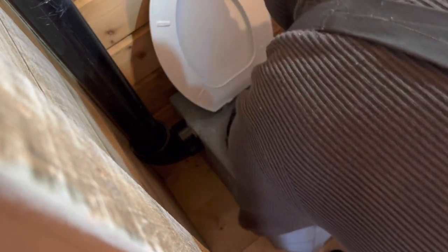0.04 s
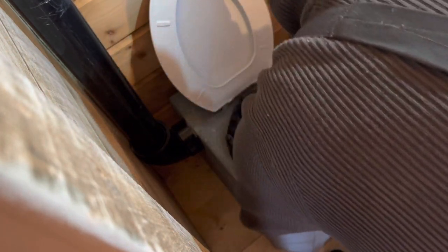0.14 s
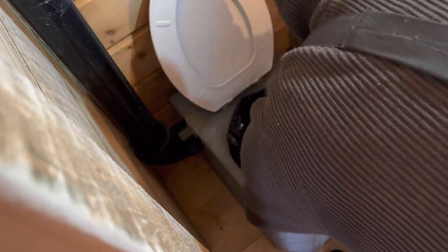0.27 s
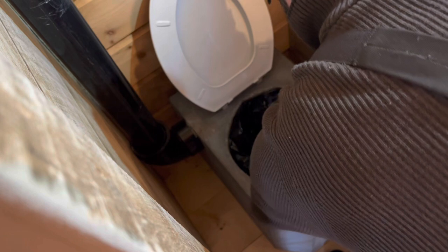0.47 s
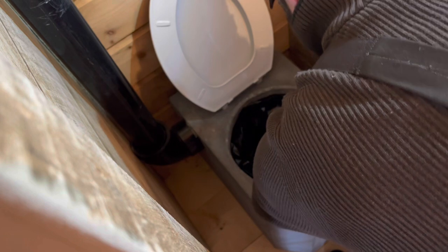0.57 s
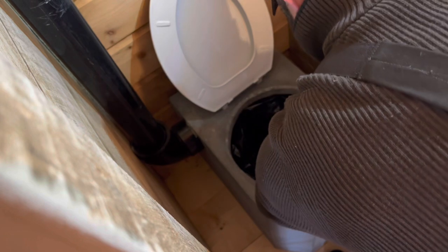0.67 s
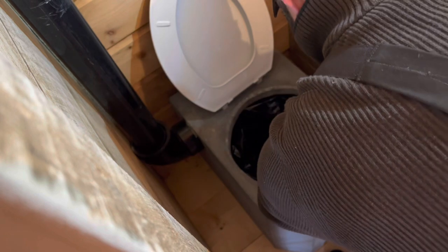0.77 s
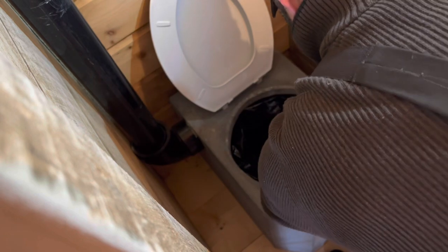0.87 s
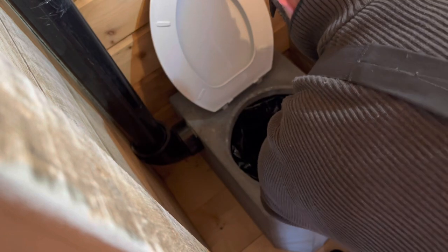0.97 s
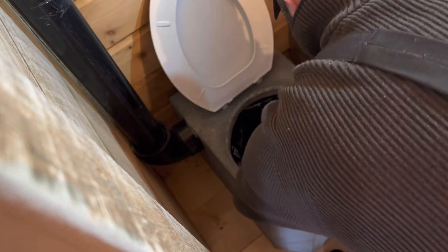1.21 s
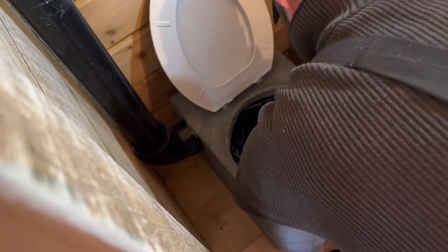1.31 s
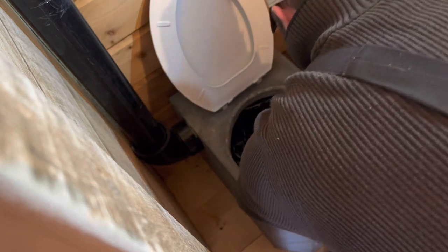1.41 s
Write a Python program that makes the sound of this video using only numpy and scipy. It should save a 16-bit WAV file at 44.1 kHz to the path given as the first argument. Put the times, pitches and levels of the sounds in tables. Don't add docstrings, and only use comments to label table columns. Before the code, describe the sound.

A plastic pail lined with a heavy bag is shoved into a concrete base; soft bumps first, then a loud cluster of hollow knocks with scraping and floor boom, fading to faint rustles, close in a small wooden room.

```python
import sys
import numpy as np
from scipy import signal
from scipy.fft import rfft, irfft, next_fast_len
from scipy.io import wavfile
from scipy.ndimage import uniform_filter1d, minimum_filter1d

SR = 44100
rng = np.random.default_rng(int(sys.argv[2]) if len(sys.argv) > 2 else 0)


def makeup_ratio(level_db):
    decades = np.asarray(level_db, float) / 20
    return 10 ** decades


def unload_audio(sound):
    columns = np.transpose(np.atleast_2d(sound))
    steps = np.round(np.clip(columns, -1, 1) * 32767)
    wavfile.write(sys.argv[1], SR, steps.astype(np.int16))


N = 63945


def evened(x):
    return x / np.sqrt(np.mean(x ** 2) + 1e-20)


def read(points, hz):
    f, value = np.transpose(points)
    return np.interp(np.log(hz + 1), np.log(f + 1), value)


def follow(points):
    return makeup_ratio(np.interp(np.arange(N) / SR, *np.transpose(points)))


def add(mix, s, sound):
    part = mix[round(s * SR):][:len(sound)]
    part += sound[:len(part)]


def colour(x, points):
    db = read(points, abs(np.fft.fftfreq(4096, 1 / SR)))
    log = np.log(makeup_ratio(np.maximum(db, -100)))
    taps = np.fft.ifft(np.exp(np.conj(signal.hilbert(log)))).real[:2048]
    return signal.oaconvolve(x, taps / np.linalg.norm(taps))[:len(x)]


def ring(modes, extra_db=0, length=1.0, phase=0):
    hz, db, t60 = np.transpose(modes)[:, :, None]
    t = np.arange(0, length, 1 / SR)
    return (makeup_ratio(db + extra_db - 60 * t / t60) * np.sin(2 * np.pi * hz * t + phase)).sum(0)


# [t/s, deep pair level/dB, upper pair level/dB]
FLOOR_SHOVES = [(.003, -32, -47), (.03, -21, -33.5), (0.072, -34, -44), (0.113, -37, -27),
                (0.151, -42, -24.5), (0.213, -15.5, -33), (0.24, -25, -19.5), (0.321, -36.5, -27.5),
                (0.362, -20, -26.5), (0.398, -35, -38), (0.446, -37, -21), (0.496, -10, -6.5),
                (0.524, -34.5, -11.5), (0.561, -7.5, -13), (.625, -25.5, -13), (0.703, -61, -13),
                (0.769, -28.5, -28.5), (0.831, -43, -29.5), (.862, -53, -29.5), (0.894, -32, -29.5),
                (0.944, -25.5, -29), (0.999, -60, -42.5), (1.09, -33, -41.5), (1.201, -50.5, -69.5),
                (1.27, -79, -60), (1.336, -45, -51.5), (1.388, -39.5, -41.5), (1.43, -70, -75)]
# [f/Hz, level/dB, t60/s]
DEEP_FLOOR = [(72.12, -4, 0.84), (95.37, -2, 0.39)]
# [f/Hz, level/dB, t60/s]
UPPER_FLOOR = [(125.94, -0.8, 0.3), (140.6, 0.091, 0.15)]
SHOVE_S = 0.008


def floor():
    out = np.zeros(N)
    push = np.hanning(round(SHOVE_S * SR))
    push = push / push.sum()
    deep = signal.oaconvolve(ring(DEEP_FLOOR), push)
    upper = signal.oaconvolve(ring(UPPER_FLOOR), push)
    for s, deep_db, upper_db in FLOOR_SHOVES:
        add(out, s, makeup_ratio(deep_db + 2.0) * deep + makeup_ratio(upper_db + 8.5) * upper)
    return out


# [t/s, level/dB]
RIM_DRAG = [(0.0, -34), (0.06, -40), (0.096, -34.5), (0.432, -45.5), (0.444, -22.5), (0.48, -17),
            (0.5, -8.5), (0.568, -18), (0.58, -22.5), (0.678, -34.5), (0.71, -43.5), (0.86, -52.5),
            (0.988, -45.5), (1.174, -65.5), (1.214, -60), (1.45, -41)]
# [f/Hz, level/dB, t60/s]
PAIL_WALL = [(484, -11.5, 0.62), (553.7, -1, 0.29), (585, -5.5, 0.047), (630.7, 2.5, 0.16),
             (1189, -3.5, 0.077), (1344, -3, 0.07), (809, 3.5, 0.037), (904.5, -9, 0.22),
             (1088, -5.5, 0.04), (1116.6, -7.5, 0.16), (1260, -3, 0.064), (1589, -5, 0.057),
             (1520, -15, 0.34), (2070, -33.5, 0.12)]
# [f/Hz, level/dB, t60/s]
PAIL_HOLLOW = [(223.7, -4, 0.09), (256, -1.5, 0.16), (354.6, -3, 0.12), (384, -19.5, 0.073)]
# [f/Hz, level/dB per Hz]
DENSE_WALL = [(150, -19.5), (220, 12.5), (390, 2), (600, 5), (1300, -5.5), (2200, -4.5), (3500, -13),
              (16000, -63.5)]
DRAG_DB, DRAG_CAP_DB, SLIPS_PER_S = -5.5, -30, 900


def drag():
    slips = rng.standard_normal(N) * (rng.random(N) < SLIPS_PER_S / SR)
    grit = slips * makeup_ratio(3.07 * rng.exponential(1, N))
    damped = [(hz, db, 0.79 * t60) for hz, db, t60 in PAIL_HOLLOW[:2] + PAIL_WALL]
    ringing = evened(signal.oaconvolve(grit, ring(damped, length=.3))[:N])
    dense = evened(colour(rng.standard_normal(N), DENSE_WALL))
    strength = np.minimum(makeup_ratio(DRAG_DB) * follow(RIM_DRAG), makeup_ratio(DRAG_CAP_DB))
    return strength * evened(ringing + 1.22 * dense)


# [t/s, level/dB]
BAG_STROKES = [(0.0, -40), (0.056, -48), (0.406, -57), (0.5, -34), (0.516, -38), (0.576, -41.5),
               (0.674, -59), (0.71, -61.5), (0.786, -71.5), (0.868, -48), (1.024, -56), (1.134, -80),
               (1.23, -55), (1.32, -59.5), (1.336, -48.5), (1.368, -52.5), (1.408, -46), (1.45, -51)]
# [t/s, peak level/dB]
BAG_SNAPS = [(0.2286, -38.5), (0.2969, -34), (0.419, -45), (0.4418, -41), (0.47, -36), (0.4932, -45.5),
             (0.5414, -28), (0.5784, -31), (0.6914, -44), (0.8377, -44), (1, -43), (1.192, -47),
             (1.231, -44.5), (1.3315, -38.5), (1.3338, -40), (1.4019, -38)]
BAG_DB, CREASES_PER_S, CREASE_DB, CREASE_SHARE = 5, 830, 8.5, 0.37
SNAP_DB, SNAP_T60 = -10, 0.07
TICK_DB, TICK_T60 = 8, 0.0038


def bag_motion():
    sizes = makeup_ratio(2 * CREASE_DB * np.minimum(rng.exponential(1, N), 5))
    creases = sizes * (rng.random(N) < CREASES_PER_S / SR)
    creases = np.sqrt(abs(signal.lfilter([1], [1, -np.exp(-1 / (0.0052 * SR))], creases)))
    texture = CREASE_SHARE * evened(creases) + 1 - CREASE_SHARE
    power = (follow(BAG_STROKES) * texture * makeup_ratio(BAG_DB)) ** 2
    for s, db in BAG_SNAPS:
        add(power, s, makeup_ratio(db + SNAP_DB - 60 * np.arange(3000) / SR / SNAP_T60) ** 2)
        add(power, s, makeup_ratio(db + TICK_DB - 60 * np.arange(400) / SR / TICK_T60) ** 2)
    return np.sqrt(power)


# [f/Hz, level/dB per Hz]
BAG_SPECTRUM = [(200, -14.5), (400, -1.5), (1000, -4), (3000, -5.5), (8000, -9), (12000, -13.5),
                (15800, -16.5)]


def bag(motion):
    return colour(motion * rng.standard_normal(N), BAG_SPECTRUM)


# [f/Hz, level/dB per Hz]
ROOM_AIR = [(15, -13), (25, -20), (110, 6), (210, -11.5), (5210, -65), (9420, -70), (11700, -52.5),
            (15700, -75.5)]
AIR_DB = -49.5


def air():
    return makeup_ratio(AIR_DB) * colour(rng.standard_normal(N), ROOM_AIR)


# [t/s, f/Hz, level/dB, t60/s]
WALL_PANELS = [(.095, 623, -39.5, 0.23), (.095, 1223, -42, 0.1), (.322, 1526, -46, .15),
               (.446, 1520, -28, 0.093), (.468, 617, -22, 0.19), (.474, 1968, -25.5, 0.072),
               (.4905, 1065, -9, 0.11), (.494, 1810, -30, 0.037), (.495, 542.7, -13.5, 0.13),
               (.503, 883, -8.5, 0.14), (.504, 1260, -16.5, 0.22), (.526, 1235, -6, 0.027),
               (.54, 540, -15.5, 0.26), (.553, 1627, -21.5, 0.28), (.5765, 639.4, -5.5, 0.19),
               (.577, 1208, -18, 0.043), (.592, 494.7, -16.5, 0.28), (.592, 349.5, -18, 0.49),
               (.49, 242.7, -17.5, .3), (.596, 903, -27, 0.17), (.598, 643, -16.5, 0.23),
               (.6, 1118, -28, 0.21), (.618, 487.7, -20, 0.28), (.705, 635, -29, .3),
               (.71, 1610, -41, 0.16), (.692, 1170, -27, 0.1), (.692, 1339, -30.5, 0.12),
               (.705, 860, -28, 0.091), (.705, 541, -23.5, 0.16), (.708, 254.3, -27, 0.46),
               (.753, 513.3, -26, 0.14), (.81, 530.4, -36, 0.18), (.705, 363.7, -18, 0.19),
               (.85, 256, -36, 0.62)]
PANEL_RISE_S = 0.0018


def panels(turned):
    out = np.zeros(N)
    rise = np.minimum(np.arange(SR // 2) / SR / PANEL_RISE_S, 1)
    for k, (s, *mode) in enumerate(WALL_PANELS):
        phase = turned * (-1) ** k * np.pi / 2
        add(out, s, rise * ring([mode], 0, .5, phase)[:len(rise)])
    return out


# [t/s, level/dB, centre of struck modes/octaves above 700 Hz, chatter/s, hollow level/dB]
RIM_KNOCKS = [(.097, -30.5, 1, 0.043, -32), (.225, -42, -0.76, 0.022, -36),
              (.32, -34, -0.029, 0.0022, -40.5), (.365, -52, -0.5, 0.011, -43),
              (.444, -23.5, 1, 0.012, -38.5), (.466, -22.5, 0.74, 0.0072, -23.5),
              (.4915, -6, 0.79, 0.033, -28.5), (.505, -8, 0.46, 0.012, -38),
              (.526, -15.5, 0.65, 0.0059, -18), (.549, -13.5, 0.71, 0.0079, -35),
              (.577, -4.5, 0.31, 0.0042, -14), (.596, -11.5, -1.08, 0.011, -23.5),
              (.618, -18.5, -1, 0.0091, -21), (.64, -20.5, -0.7, 0.019, -21), (.692, -20, 0.48, 0.061, -22),
              (.705, -16.5, -0.96, 0.029, -19), (.728, -31.5, 0.61, 0.011, -53),
              (.765, -26, -1.1, 0.051, -35), (.845, -40, -0.4, 0.035, -37), (.9, -35, -1.06, 0.026, -51.5),
              (1.214, -49.5, -0.28, 0.012, -66.5), (1.273, -54, -0.24, 0.019, -54),
              (1.331, -42, -1, 0.0083, -42), (1.40, -40, 0.74, 0.018, -73)]
WALL_DB, WALL_T60 = -7, 0.11
FOCUS_DB, FAR_DB = 5, 15.5
MIX_DB = 1.5
FIRST_CONTACT = 50
HARD_LIFT = 1


def knocks(turned, contacts, mixes):
    out, t, hz = np.zeros(N), np.arange(16000) / SR, np.geomspace(100, 16000, 40)
    phases = rng.uniform(0, 2 * np.pi, (30, len(PAIL_WALL), 1))
    tails = rng.standard_normal((30, 16000))
    pail_hz = np.array(PAIL_WALL)[:, :1]
    upper_two = np.array([[0], [0], [1], [1]])
    for k, (s, db, centre, chatter_s, hollow_db) in enumerate(RIM_KNOCKS):
        def focus(f):
            return -np.minimum(FOCUS_DB * (np.log2(f / 700) - centre) ** 2, FAR_DB)

        hit = contacts[k] * np.exp(-t[:2000] / chatter_s * 2)
        hit[0] = FIRST_CONTACT
        modes_db = focus(pail_hz) + MIX_DB * np.clip(mixes[k], -1, 1)
        body = 0.39 * ring(PAIL_WALL, modes_db, len(t) / SR, turned * phases[k])[:len(t)]
        wall = np.transpose([hz, read(DENSE_WALL, hz) + focus(hz)])
        body += colour(tails[k], wall) * makeup_ratio(WALL_DB - 60 * t / WALL_T60)

        lifted_db = hollow_db + HARD_LIFT * (hollow_db + 19.5) * upper_two
        hollow_phase = turned * phases[k, :len(PAIL_HOLLOW)]
        hollow = ring(PAIL_HOLLOW, lifted_db, len(t) / SR, hollow_phase)[:len(t)]
        add(out, s, hollow * np.minimum(t / 0.0031, 1))
        add(out, s, makeup_ratio(db) * signal.fftconvolve(body, hit / np.linalg.norm(hit)))
    return out


ROOM_DB, ROOM_T60 = -7.5, 0.18


def room(x):
    taps = np.zeros(22000)
    taps[np.arange(200, 21960, 20) + rng.integers(0, 20, 1088)] = rng.choice([-1., 1.], 1088)
    taps = taps * makeup_ratio(-60 * np.arange(22000) / SR / ROOM_T60)
    return signal.fftconvolve(x, taps / np.linalg.norm(taps))[:N]


IN_STEP_HZ, HALF_TURN_HZ = 7145, 2333
# [f/Hz, left-right likeness/0..1]
PORT_LIKENESS = [(60, 1), (170, 1), (300, 0.86), (600, 0.34), (1200, 0.12), (4000, 0.057), (7300, 0.41),
                 (9000, 0.98)]
# [f/Hz, left over right level/dB]
PORT_LEAN = [(60, -1.6), (150, -1.1), (300, -0.5), (600, -6), (1300, 0.5), (2500, -2), (5000, -8),
             (8500, -1)]


def ports(first, second):
    size = next_fast_len(N + 4096)
    hz = np.fft.rfftfreq(size, 1 / SR)
    a, b = rfft(first, size), rfft(second, size)
    turn = .5 * np.pi * np.maximum(hz - IN_STEP_HZ, 0) / HALF_TURN_HZ
    lean = makeup_ratio(read(PORT_LEAN, hz) / 2) * np.exp(1j * turn)
    same = np.clip(read(PORT_LIKENESS, hz), 0, 1)
    left = a * lean
    right = (same * a + np.sqrt(1 - same ** 2) * b) / lean
    return irfft(np.array([left, right]), size, axis=1)[:, :N]


def scene():
    motion, boom, spots = bag_motion(), floor(), []
    contacts = rng.standard_normal((30, 2000)) ** 3
    mixes = rng.standard_normal((30, len(PAIL_WALL), 1))
    for turned in (False, True):
        pail = knocks(turned, contacts, mixes) + panels(turned) + drag() + bag(motion)
        spots.append(pail + makeup_ratio(ROOM_DB) * room(pail) + boom + air())
    return ports(*spots)


SHARP_SNAPS = [.2975, 1.193, 1.335]
SHARP_SPAN_S = .004
WEAK_SHARE, GAP_DB, GAP_FROM_HZ = 0.41, -59.5, 8300
SHARE_PER_KHZ, RAGGED = .05, .08
HOLE_LEVEL, HOLES_FROM_HZ = 1.6, 1400
TOP_BAND_HZ, TOP_BAND_LOSS, TOP_HZ = 14900, .1, 15850


def thinned(x):
    sum_difference = np.array([x[0] + x[1], x[0] - x[1]]) / 2
    hz, t, z = signal.stft(sum_difference, SR, nperseg=512, noverlap=384)
    row_hz = hz[:, None]

    def patches(wide, long):
        noise = rng.standard_normal((2, 257, len(t)))
        blocks = np.repeat(np.repeat(noise, wide, 1), long, 2)[:, :257, :len(t)]
        return evened(uniform_filter1d(blocks, size=2, axis=2))

    turn = .5 * np.pi * (hz - IN_STEP_HZ) / HALF_TURN_HZ
    share = abs(np.array([np.cos(turn), np.sin(turn)]))[:, :, None]
    limit = WEAK_SHARE + SHARE_PER_KHZ * (row_hz - GAP_FROM_HZ) / 1000 + RAGGED * patches(8, 16)
    weak = (share < limit) & (row_hz > GAP_FROM_HZ)
    holes = (patches(2, 16) > HOLE_LEVEL) & (row_hz > HOLES_FROM_HZ)
    lost = weak | holes
    lost[0] |= (patches(1, 24)[0, 0] > TOP_BAND_LOSS) & (row_hz > TOP_BAND_HZ)
    lost &= abs(t - np.array(SHARP_SNAPS)[:, None]).min(0) > SHARP_SPAN_S
    gain = makeup_ratio(GAP_DB * lost - 90 * (row_hz > TOP_HZ))
    mid, side = signal.istft(z * gain, SR, nperseg=512, noverlap=384)[1][:, :N]
    return np.array([mid + side, mid - side])


def low_pass(x):
    return signal.sosfilt(signal.butter(12, 15880, fs=SR, output="sos"), x)


LOW_CUT_HZ, LIMIT = 66, .9


def record(dry):
    x = signal.sosfilt(signal.butter(8, LOW_CUT_HZ, "high", fs=SR, output="sos"), dry)
    headroom = minimum_filter1d(LIMIT / np.maximum(abs(x).max(0), LIMIT), size=301)
    mix = thinned(x * uniform_filter1d(headroom, size=301))
    return low_pass(mix)


dry = scene()
out = record(dry)
unload_audio(out)
```